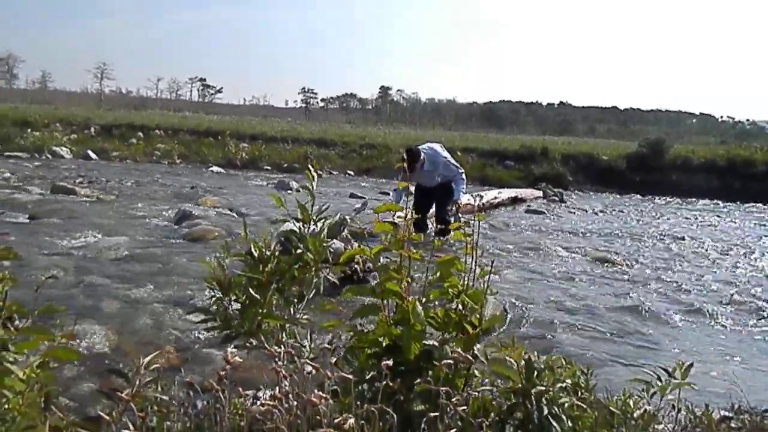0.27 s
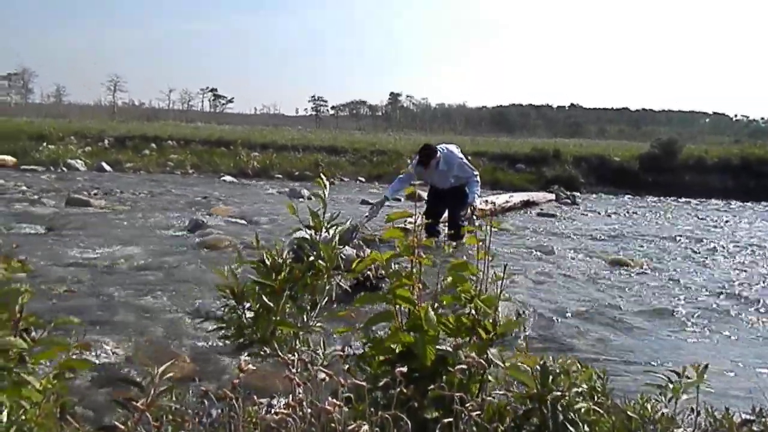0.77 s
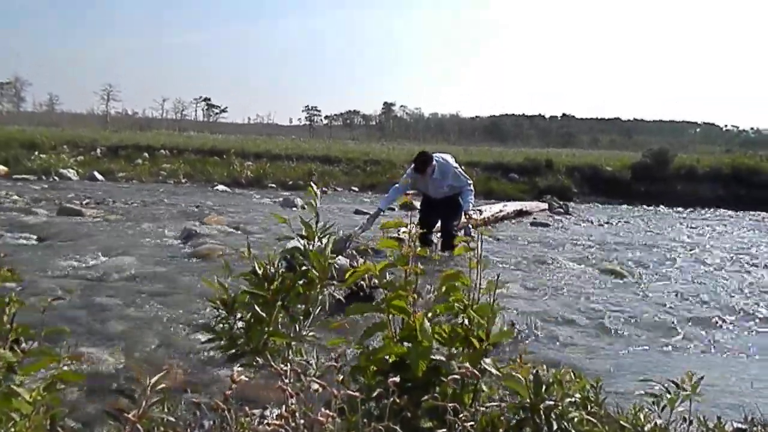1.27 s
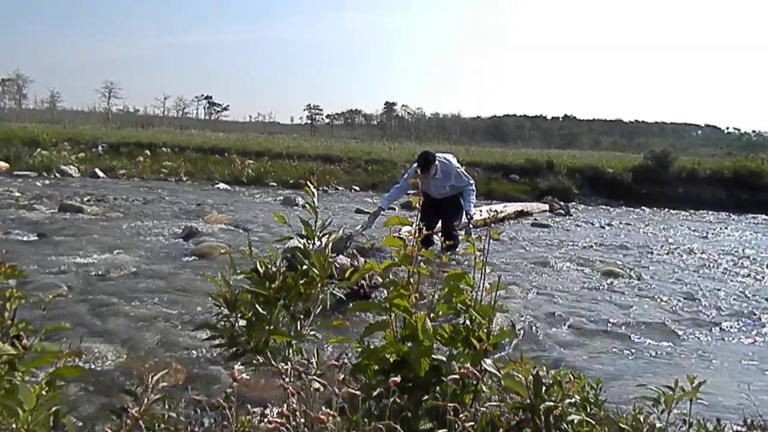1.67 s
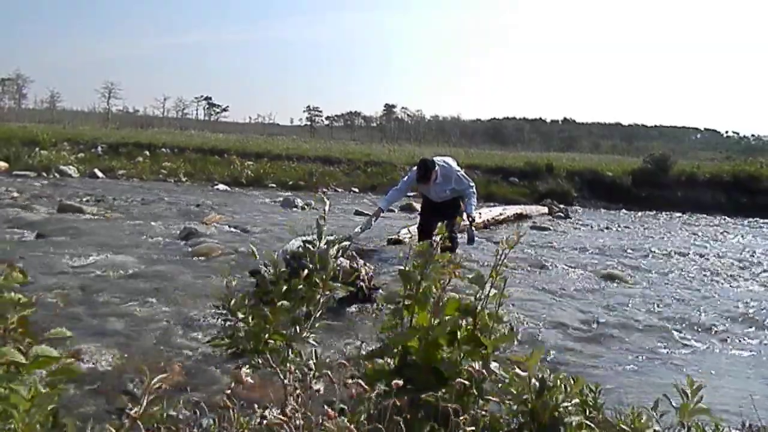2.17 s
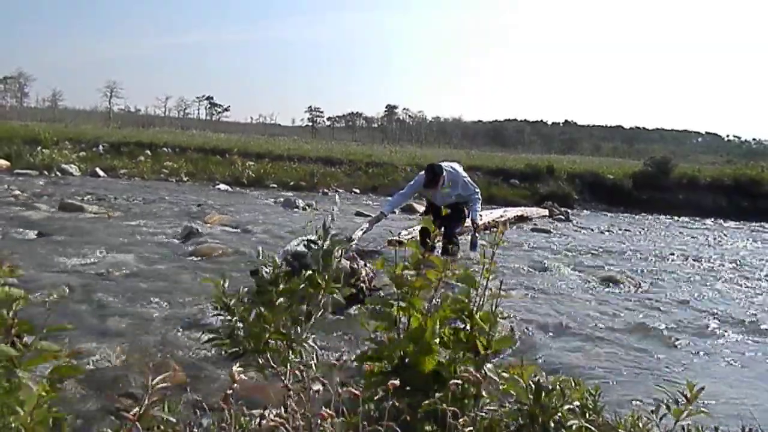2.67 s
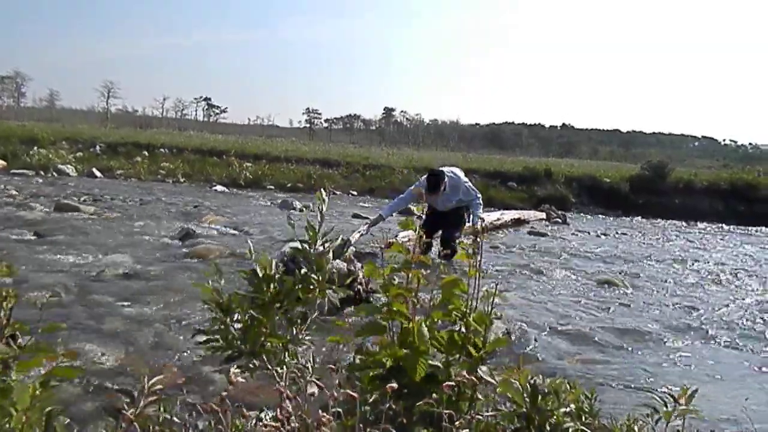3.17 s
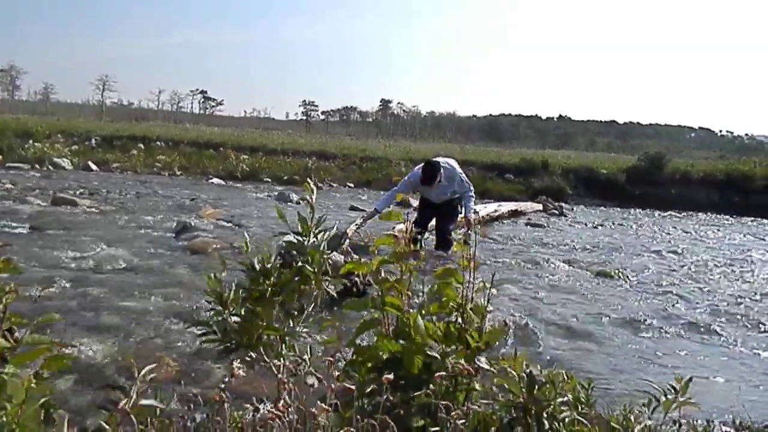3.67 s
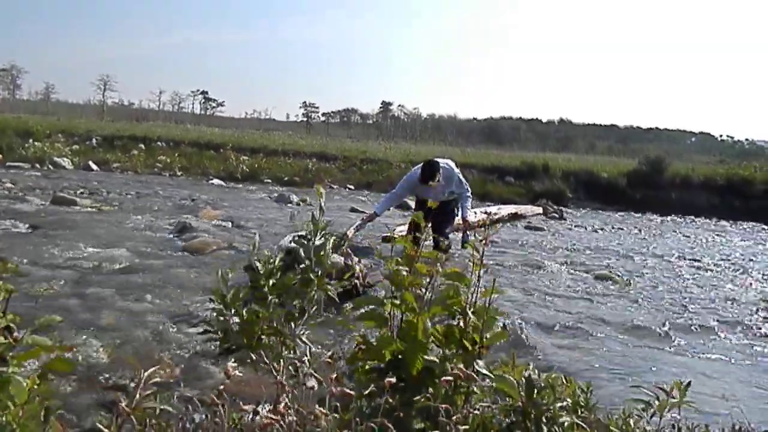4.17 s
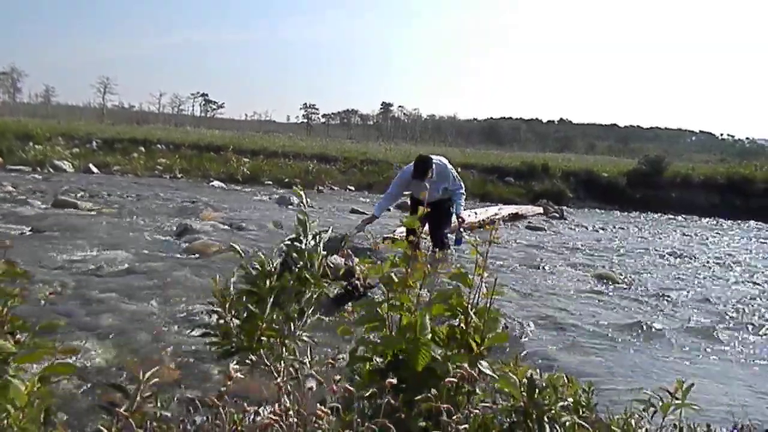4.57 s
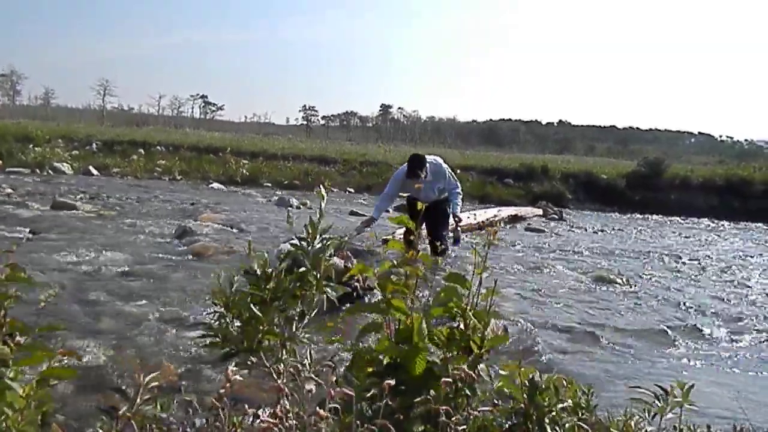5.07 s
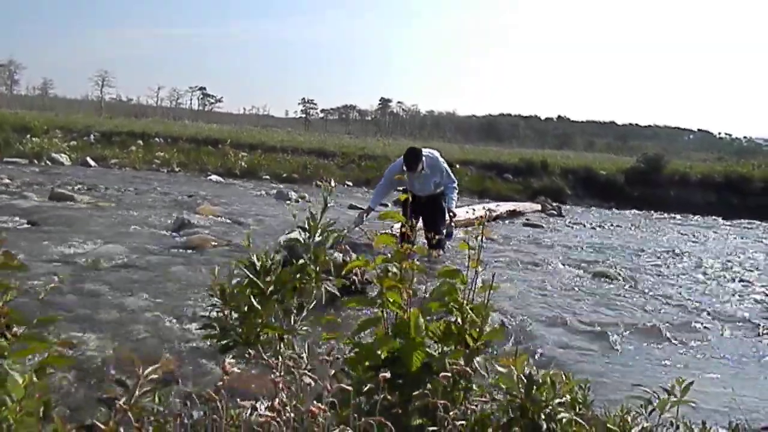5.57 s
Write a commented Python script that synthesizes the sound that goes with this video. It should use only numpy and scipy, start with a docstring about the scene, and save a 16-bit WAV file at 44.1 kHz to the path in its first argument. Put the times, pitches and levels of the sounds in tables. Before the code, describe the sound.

A shallow, fast creek rushes close by over stones for the whole six seconds or so: a dense, broad wash of hiss with fine fizzing, faint gurgling and gently shifting surges. Brief bright splashes and plips stand out, notably near 0.5, 1.9 and 3.4 seconds. Wind hits the bare microphone in short, uneven gusts, making deep lumpy rumble and fluttering. Light buffets come at 0.3 to 0.5 and around 0.9, then firmer thumps at 1.5 with rumble to about 1.8. The hardest blow lands at 2.7, a heavy overloaded thud; the water suddenly drops in level and recovers over roughly a second. More gusts follow at 3.2 and 3.55, then strong thumps at 4.2 and 4.4 with another dip. After 4.6 the wind is milder, with soft low bumps near 5.4, and the water eases slightly. Open outdoor space, identical channels, softened top end.

```python
"""A shallow, fast creek rushes over stones close to one bare microphone.
The water is a surging wash of noise with fizzing and gurgling bubbles, and single splashes on top.
Gusts shake the membrane: shaped noise rumbles, small swings flutter and hard swings thump.
A peak limiter ducks at each hard thump and creeps back up."""
import sys
import numpy as np
from scipy import signal
from scipy.fft import rfft, irfft, next_fast_len
from scipy.io import wavfile
from scipy.ndimage import uniform_filter1d

SR = 44100
rng = np.random.default_rng(int(sys.argv[2]) if len(sys.argv) > 2 else 0)


def bounce(signal):
    """Save signal as a 16-bit WAV file at the path given by the first command-line argument."""
    frames = np.transpose(np.atleast_2d(signal))
    limited = np.clip(frames, -1, 1)
    pcm = np.round(limited * 32767).astype(np.int16)
    wavfile.write(sys.argv[1], SR, pcm)


N = 256662  # length in samples


def amp(db):
    """Decibels to gain."""
    return 10 ** (np.asarray(db) / 20)


def evened(x):
    """Scales x to an rms of 1."""
    return x / np.sqrt(np.mean(x ** 2) + 1e-20)


def smoothed_twice(x, first, second):
    """Two moving averages along the first axis leave only slow changes."""
    return uniform_filter1d(uniform_filter1d(x, first, axis=0), second, axis=0)


def read(points, hz):
    """Joins (Hz, value) points on a log-frequency axis."""
    point_hz, value = np.transpose(points)
    return np.interp(np.log(hz + 1), np.log(point_hz + 1), value)


def coloured(x, points):
    """Weights the spectrum of x by a (Hz, dB) outline."""
    size = next_fast_len(len(x))
    gain = amp(read(points, np.fft.rfftfreq(size, 1 / SR)))
    return irfft(rfft(x, size) * gain, size)[:len(x)]


def noise(db, size):
    """Random short-time spectra under a field of levels, bins x frames."""
    real, imaginary = rng.standard_normal(db.shape[::-1] + (2,)).T
    spectra = (real + 1j * imaginary) * amp(db)
    return signal.istft(spectra, nperseg=size, noverlap=size * 3 // 4)[1][:N]


def add_swing(mix, s, peak, hz, cycles, rounded, glide):
    """A short swing of pressure centred on s, under a pointed (1) or rounded (2) envelope."""
    offset = np.arange(-3000, 3000)
    at = round(s * SR) + offset
    turns = offset / SR * hz
    phase = 2 * np.pi * turns * (1 + glide * np.tanh(turns / cycles))  # glide > 0 rises in pitch
    envelope = np.exp(-abs(2 * turns / cycles) ** rounded)
    inside = (at >= 0) & (at < N)
    mix[at[inside]] += (peak * envelope * np.cos(phase))[inside]


# Colour of the rushing water. Each row: frequency in Hz, relative level in dB per Hz.
WATER_COLOUR = [(30, -19), (110, -19), (200, -5), (340, 1), (520, -3), (750, -2), (950, -4.5), (1500, -3.5),
                (2400, -2.5), (3300, -5), (4200, -11), (6000, -13), (9000, -17.5), (12000, -21),
                (16000, -28.5)]
# The rush swells and eases slowly. Each row: time in seconds, rms level in dB.
WATER_LEVEL = [(0, -18), (1.2, -18.5), (2.4, -18), (3.6, -18.5), (4.8, -18), (5.3, -19), (5.82, -19.5)]


def creek():
    """Wash, fizz and gurgle share the colour of the water; single splashes lie on top."""
    fizz = bubbles(per_s=2500, low_hz=3300, high_hz=15500, cycles=4.0, spread_db=3.5, largest=4.3)
    gurgle = bubbles(per_s=500, low_hz=249.6, high_hz=2500, cycles=6.55, spread_db=4.5, largest=2.1)
    water = wash(patchy_db=0.67, surge_db=0.4) + amp(-4.5) * fizz + amp(-20.5) * gurgle
    level_db = np.interp(np.arange(N) / SR, *np.transpose(WATER_LEVEL))
    return amp(level_db) * evened(coloured(water, WATER_COLOUR)) + splashes()


def wash(patchy_db, surge_db):
    """Countless far ripples merge into hiss with drifting patches and wide surges."""
    frames = N // 128 + 8
    drifting = uniform_filter1d(rng.standard_normal((frames, 257)), 20, axis=0)
    patches = evened(uniform_filter1d(drifting, 9, axis=1)).T
    slow, quick = rng.standard_normal((2, frames))
    surges = evened(uniform_filter1d(slow, 40)) + 2.2 * evened(uniform_filter1d(quick, 5))
    return evened(noise(patchy_db * patches + surge_db * surges, size=512))


def bubbles(per_s, low_hz, high_hz, cycles, spread_db, largest, count=20):
    """Trapped air rings for a few cycles and glides up; most bubbles are small, a few large."""
    starts = rng.random(N) < per_s / SR
    size = amp(spread_db * np.minimum(rng.exponential(1, N), largest)) * starts
    kind = rng.integers(0, count, N)  # which of the pitches each bubble takes
    out = np.zeros(N)
    for k, hz in enumerate(np.linspace(low_hz, high_hz, count)):
        turns = np.arange(1 / SR, 3 * cycles / hz, 1 / SR) * hz
        envelope = turns * np.exp(-3 * turns / cycles)
        ring = envelope * np.sin(2 * np.pi * turns * (1 + 0.164 * turns / cycles))
        out += signal.oaconvolve(size * (kind == k), ring / np.linalg.norm(ring))[:N]
    return evened(out)


# Single splashes that stand out.
# Each row: centre in seconds, peak level in dB, pitch at the centre in Hz, envelope width in cycles.
SPLASH_EVENTS = [(.016, -13, 11000, 8), (.107, -10.5, 4150, 5), (.482, -11, 5000, 12), (0.515, -4, 5700, 4),
                 (.515, -7, 10500, 9.7), (.821, -9, 4500, 5), (0.849, -10, 4030, 5), (.959, -13, 2290, 10),
                 (1.229, -9, 10100, 13), (1.424, -9, 12500, 4), (1.669, -10, 5560, 5), (1.941, -6, 4430, 4),
                 (2.049, -10.5, 776, 7.5), (2.336, -10, 3800, 5), (2.448, -9, 12000, 5),
                 (2.478, -11, 3500, 5), (3.027, -11, 10800, 5), (3.444, -1, 5330, 1.4),
                 (3.667, -9, 10740, 5), (4.893, -8, 4000, 3.3), (5.572, -10.5, 3400, 5.5),
                 (5.718, -11, 2500, 9)]


def splashes():
    """Each splash is a brief ring whose pitch glides up like a rising bubble."""
    out = np.zeros(N)
    for s, db, hz, cycles in SPLASH_EVENTS:
        add_swing(out, s, amp(db), hz, cycles, rounded=1.2, glide=0.15)
    return out


THUMP_SWINGS = 0.58  # envelope width of thumps and flutter, in cycles


def wind():
    """Eddies shake the membrane: rumble and flutter follow the gusts, hard thumps stand out."""
    t = np.arange(N // 256 + 8) * 256 / SR  # one value per noise frame
    gust_db, brightness = gusts(t)
    return rumble(t, gust_db, brightness) + flutter(t, gust_db, brightness) + thumps()


# Hard buffets of air on the membrane.
# Each row: centre in seconds, peak level in dB before the limiter, swing frequency in Hz.
THUMP_EVENTS = [(0.288, -11.5, 70), (.360, -1.5, 125), (0.473, -10, 114), (0.993, -12, 90), (1.499, 2, 148),
                (1.521, 0.1, 197), (1.672, -11, 90), (2.119, -9, 98.7), (2.440, -9, 85), (2.678, -10, 110),
                (2.697, 15.5, 196), (2.722, 7, 230), (2.753, 10.5, 300), (3.568, -2, 174),
                (3.605, -3.5, 131), (4.149, -8, 171), (4.177, 3.5, 170), (4.219, -2.5, 200),
                (4.391, 10.5, 183), (4.407, 8, 200), (5.363, -10, 80), (5.412, -12, 70)]
# Ragged side swings: level in dB below the thump, furthest offset in seconds, pitch ratios.
SHUDDER_DB, SHUDDER_S, SHUDDER_LOW, SHUDDER_HIGH = -7, 0.00695, 0.63, 2.85


def thumps():
    """A hard buffet swings the membrane about once, with three ragged side swings around it."""
    out = np.zeros(N)
    for s, db, hz in THUMP_EVENTS:
        sign = rng.choice([-1, 1])
        add_swing(out, s, sign * amp(db), hz, THUMP_SWINGS, rounded=0.98, glide=0)
        for when, part, pitch in rng.uniform(-1, 1, (3, 3)):
            side_s = s + SHUDDER_S * when
            side_peak = part * amp(db + SHUDDER_DB)
            side_hz = hz * np.interp(pitch, (-1, 1), (SHUDDER_LOW, SHUDDER_HIGH))
            add_swing(out, side_s, side_peak, side_hz, THUMP_SWINGS, rounded=0.83, glide=0)
    return out


# Colour of the rumble at brightness 0. Each row: frequency in Hz, relative level in dB per Hz.
RUMBLE_COLOUR = [(8, -1), (25, 15.5), (60, 0), (150, -5.5), (300, -17.5), (600, -29), (1200, -33),
                 (3000, -70)]


def rumble(t, gust_db, brightness):
    """Turbulence on the membrane is lumpy low noise whose level and tilt follow the gusts."""
    hz = np.fft.rfftfreq(1024, 1 / SR)[:, None]
    tilt_octaves = np.log2(np.clip(hz, 20, 400) / 80)
    colour_db = read(RUMBLE_COLOUR, hz) + brightness * tilt_octaves
    colour_db = colour_db - 20 * np.log10(np.linalg.norm(amp(colour_db), axis=0))  # equal power per frame
    lumps = evened(smoothed_twice(rng.standard_normal(N), 900, 900))
    lumpy = evened(noise(colour_db, size=1024)) * amp(2.0 * np.clip(lumps, -3, 1.2))
    return evened(lumpy) * amp(np.interp(np.arange(N) / SR, t, gust_db))


FLUTTER_PER_S, FLUTTER_DB = 110, 5  # average rate, largest peak in dB above the gust level
FLUTTER_LOW_HZ, FLUTTER_HIGH_HZ = 90, 264  # pitch range at brightness 0
FLUTTER_OCTAVES_PER_BRIGHTNESS = 0.13  # bright gusts flutter at higher pitch
FLUTTER_UNEVEN = 0.6  # share by which gaps and sizes vary


def flutter(t, gust_db, brightness):
    """Small buffets push the membrane either way, at uneven gaps and sizes."""
    out = np.zeros(N)
    gap, pitch, size, push = rng.random((1000, 4)).T
    times = np.cumsum((1 + FLUTTER_UNEVEN * (2 * gap - 1)) / FLUTTER_PER_S)
    for s, p, part, sign in zip(times[times < N / SR], pitch, size, np.sign(push - 0.5)):
        pitch_ratio = 2 ** (FLUTTER_OCTAVES_PER_BRIGHTNESS * np.interp(s, t, brightness))
        hz = np.interp(p, (0, 1), (FLUTTER_LOW_HZ, FLUTTER_HIGH_HZ)) * pitch_ratio
        peak = (1 - FLUTTER_UNEVEN * part) * amp(FLUTTER_DB + np.interp(s, t, gust_db))
        add_swing(out, s, sign * peak, hz, THUMP_SWINGS, rounded=1.0, glide=0)
    return out


# Gusts on the microphone. Each row: time of reaching full level in seconds, hold in seconds,
# rumble level in dB, brightness in dB per octave.
GUST_EVENTS = [(0.088, 0.036, -40, -2), (0.284, 0.1, -23.5, -5.5), (.45, 0.039, -24.5, 2),
               (0.91, 0.14, -25.5, -6.5), (1.375, 0.11, -33, -10), (1.487, 0.056, -19, -0.5),
               (1.67, 0.1, -16, -6.5), (1.744, 0.069, -30, 1), (1.87, 0.095, -27, -4.5),
               (2.11, .12, -26.5, -6.5), (2.42, 0.055, -23.5, 3.5), (2.59, .04, -32, 0.1),
               (2.67, 0.034, -18, 1.5), (2.699, 0.067, -10.5, -1.5), (3.06, 0.066, -28, -5),
               (3.22, 0.084, -16, -0.5), (3.49, .05, -22, -1), (3.545, 0.038, -13.5, 3),
               (3.644, 0.11, -25.5, 1), (4.076, .05, -26, -14), (4.145, 0.036, -21, -1),
               (4.196, 0.055, -13, 3), (4.353, 0.087, -16, 2), (4.45, .05, -26, -18),
               (4.612, 0.18, -24, -2), (4.889, .04, -32, 4), (5.309, 0.12, -25, 0.5), (5.48, 0.1, -26.5, 2),
               (5.623, .2, -33, 0.5)]
RISE_DB_PER_S, FALL_DB_PER_S = 343, 273
CALM_DB, CALM_BRIGHTNESS, CALM_DRIFT_DB = -37, 6.6, -0.5  # the breeze between gusts


def gusts(t):
    """Each gust rises, holds and dies away over a drifting breeze; returns level and brightness."""
    start, hold, gust_db, brightness = np.transpose(GUST_EVENTS)[:, :, None]
    rise_db = RISE_DB_PER_S * np.maximum(start - t, 0)
    fall_db = FALL_DB_PER_S * np.maximum(t - start - hold, 0)
    drift = evened(smoothed_twice(rng.standard_normal(len(t)), 12, 12))
    breeze_db = CALM_DB + CALM_DRIFT_DB * drift
    power = amp(np.vstack([gust_db - rise_db - fall_db, breeze_db])) ** 2
    total = power.sum(0)
    # the strongest gust at each moment sets most of the brightness
    blend = (power * np.vstack([brightness, [CALM_BRIGHTNESS]])).sum(0) / total
    return 10 * np.log10(total), blend


def scene():
    """One microphone feeds both channels."""
    return np.tile(creek() + wind(), (2, 1))


# Microphone response: dull top with a deep notch. Each row: frequency in Hz, gain in dB.
MIC_RESPONSE = [(6000, 1), (7000, -2), (7500, -11), (7800, -32), (7950, -44), (8100, -14), (8200, -25.5),
                (8450, -11), (9000, -9), (16000, -6)]
CEILING_DB, RECOVER_DB_PER_S = -3, 16.5  # peak limiter
EDGE_HZ = 15700  # upper band limit


def record(dry):
    """Microphone colour; a peak limiter drops at once and recovers steadily; then the band limit."""
    heard = coloured(dry[0], MIC_RESPONSE)
    level_db = 20 * np.log10(abs(uniform_filter1d(heard, 5)) + 1e-9)
    recovery_db = np.arange(N) * RECOVER_DB_PER_S / SR
    # a running maximum on a rising ramp is a peak hold that falls steadily
    held_db = np.maximum.accumulate(level_db + recovery_db) - recovery_db
    over_db = np.maximum(held_db - CEILING_DB, 0)
    ceiling = amp(CEILING_DB)
    limited = np.tile(np.clip(heard / amp(over_db), -ceiling, ceiling), (2, 1))
    low_pass = signal.firwin(1023, EDGE_HZ, window=("kaiser", 9), fs=SR)
    return signal.oaconvolve(limited, low_pass[None], "same")


dry = scene()
out = record(dry)
bounce(out)
```